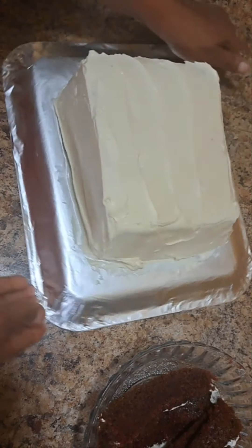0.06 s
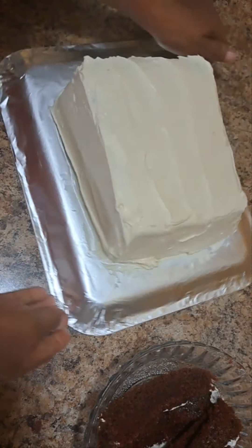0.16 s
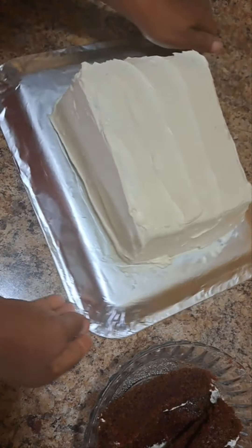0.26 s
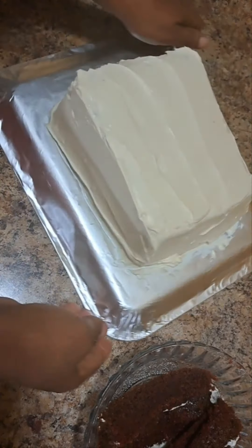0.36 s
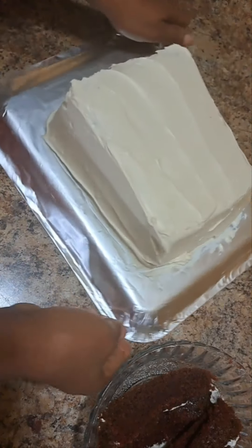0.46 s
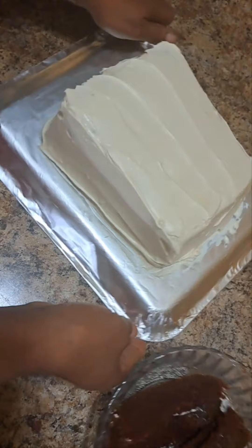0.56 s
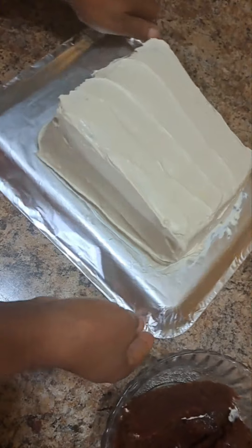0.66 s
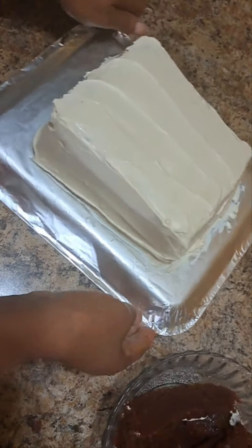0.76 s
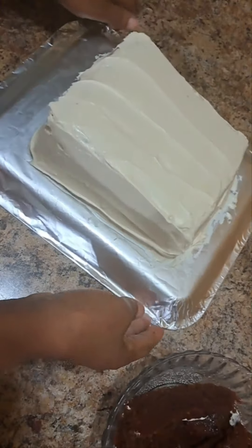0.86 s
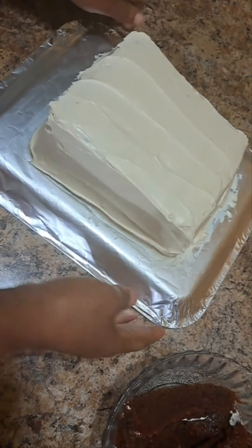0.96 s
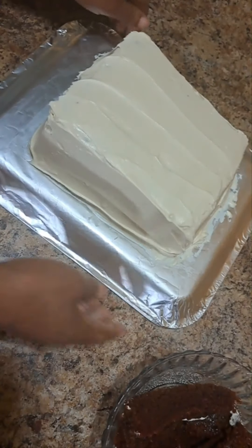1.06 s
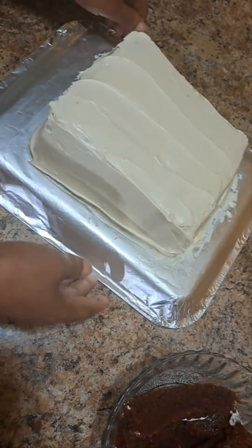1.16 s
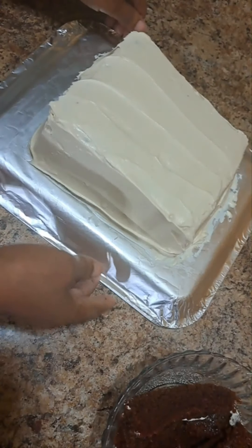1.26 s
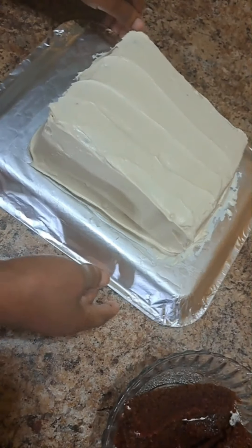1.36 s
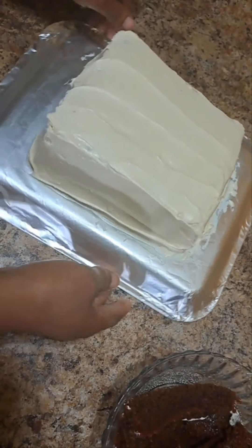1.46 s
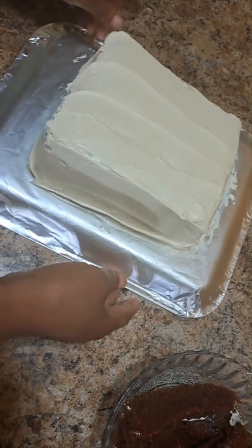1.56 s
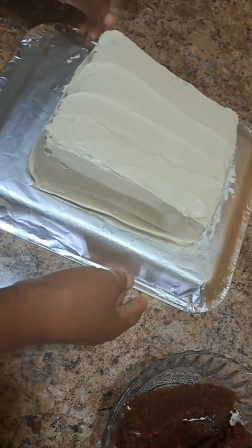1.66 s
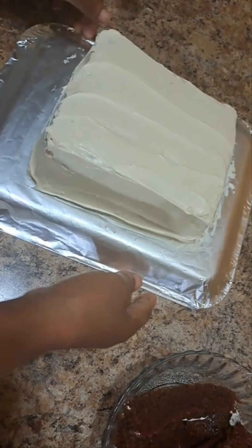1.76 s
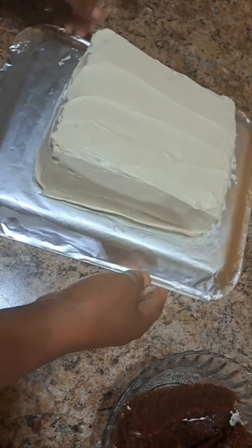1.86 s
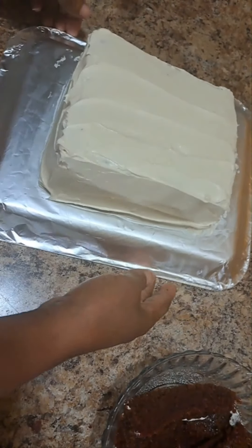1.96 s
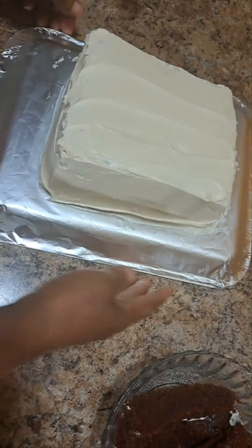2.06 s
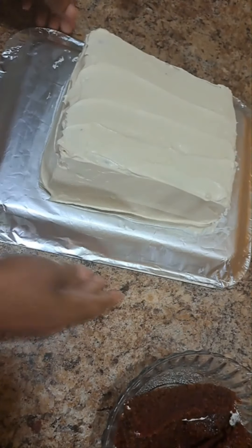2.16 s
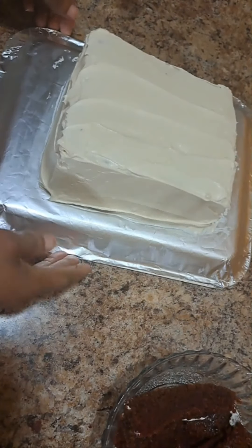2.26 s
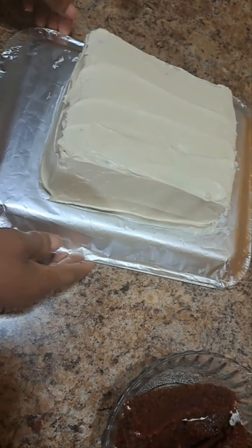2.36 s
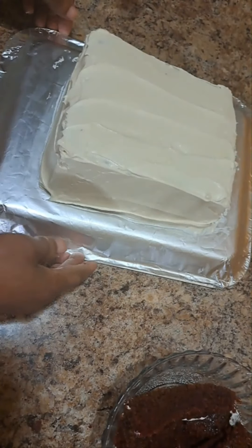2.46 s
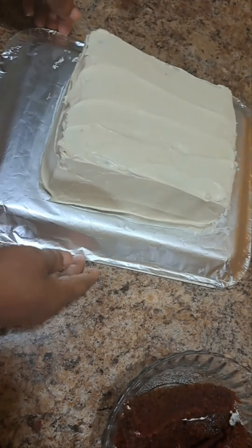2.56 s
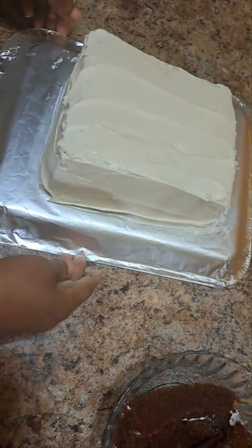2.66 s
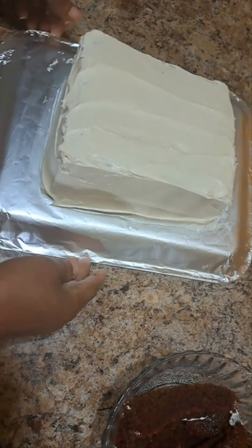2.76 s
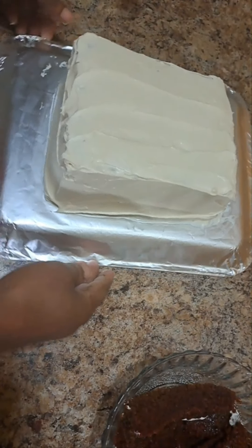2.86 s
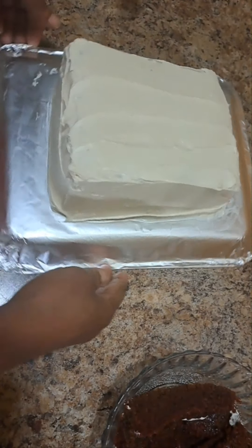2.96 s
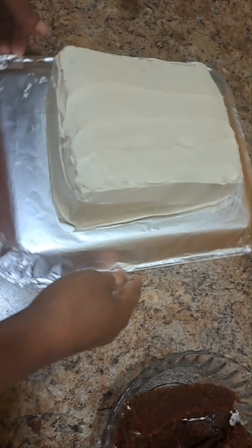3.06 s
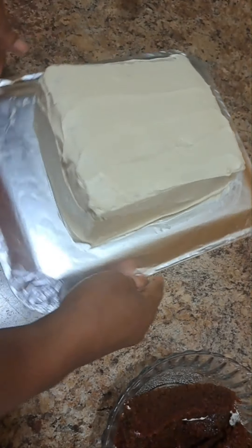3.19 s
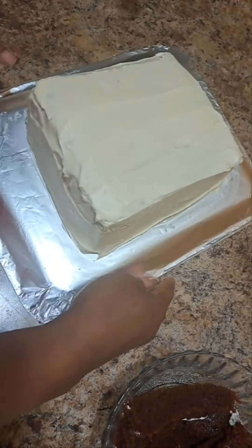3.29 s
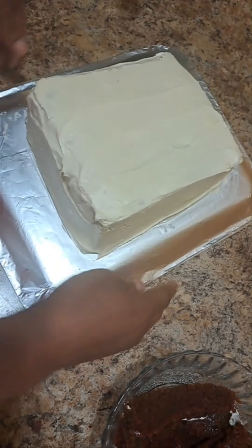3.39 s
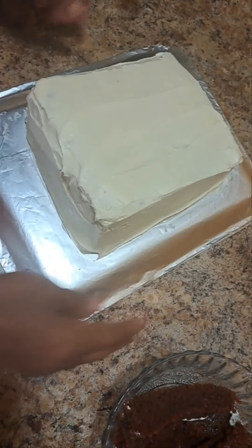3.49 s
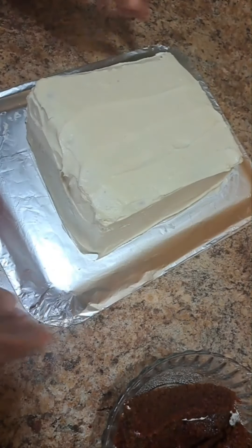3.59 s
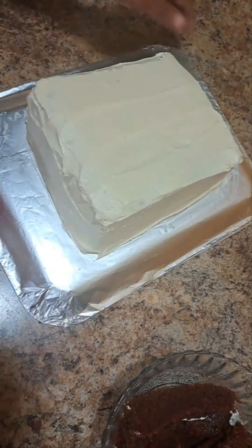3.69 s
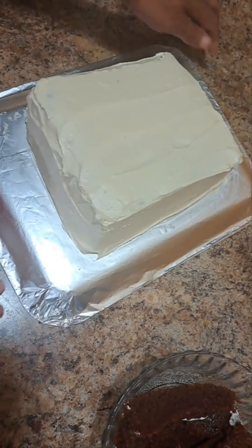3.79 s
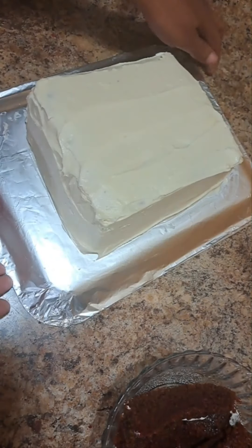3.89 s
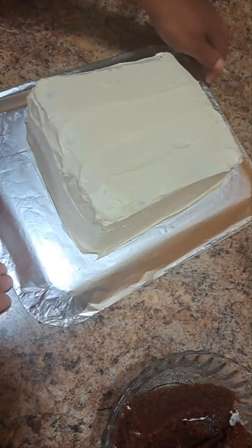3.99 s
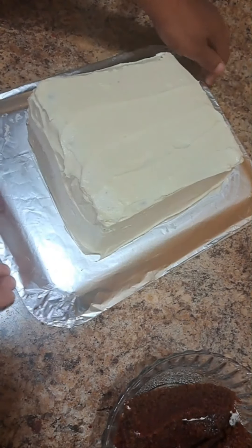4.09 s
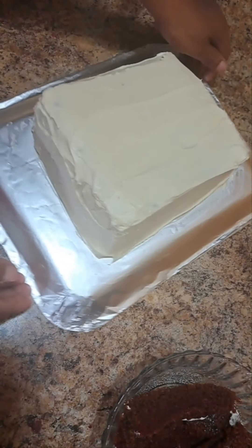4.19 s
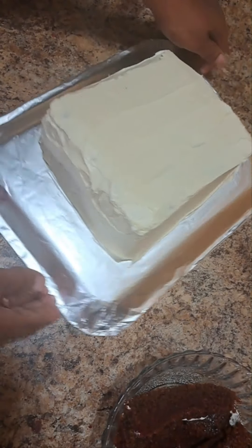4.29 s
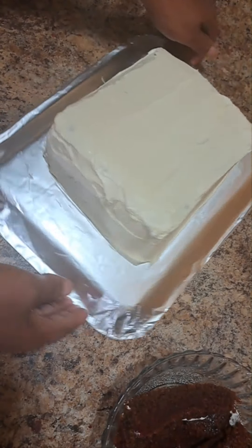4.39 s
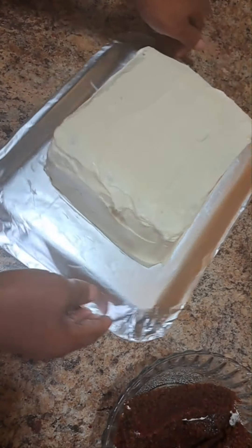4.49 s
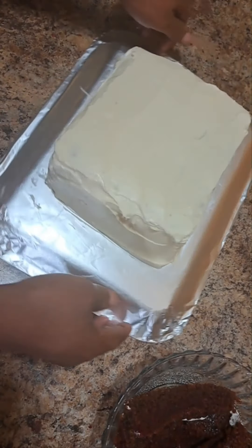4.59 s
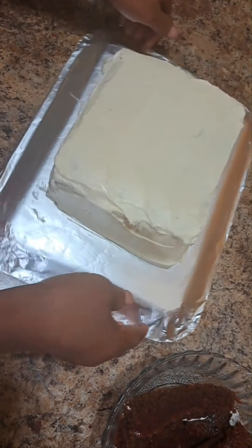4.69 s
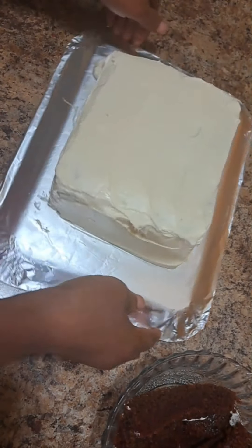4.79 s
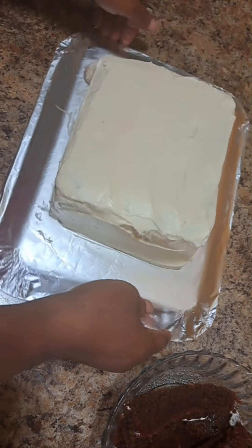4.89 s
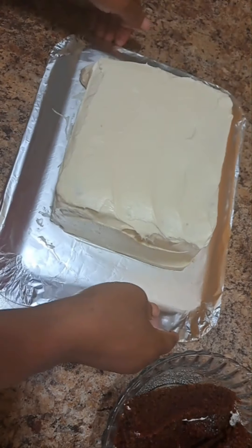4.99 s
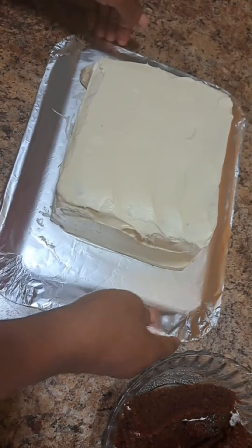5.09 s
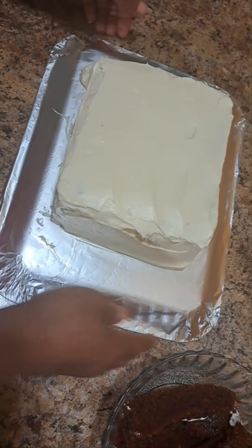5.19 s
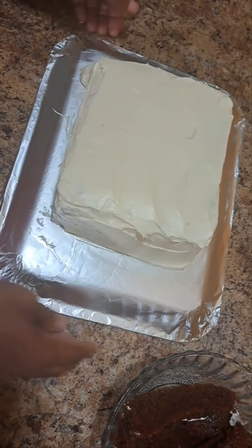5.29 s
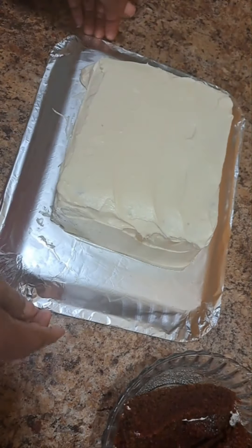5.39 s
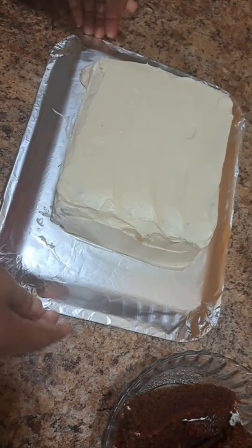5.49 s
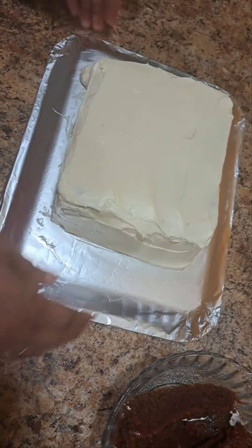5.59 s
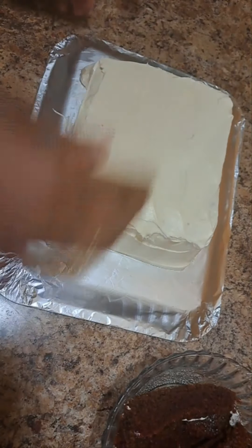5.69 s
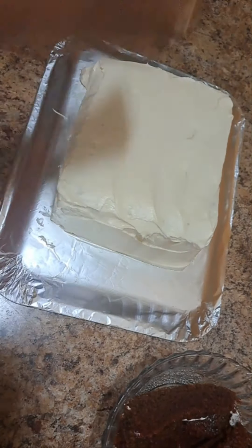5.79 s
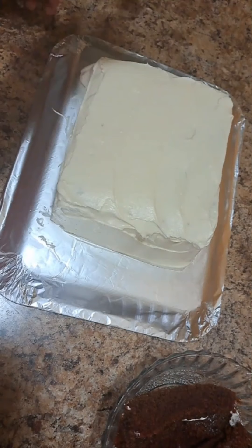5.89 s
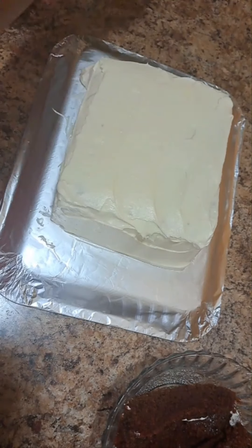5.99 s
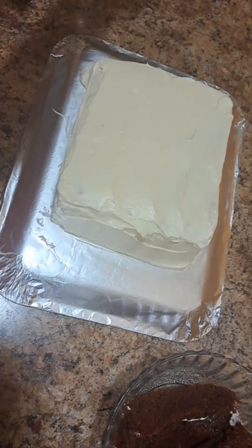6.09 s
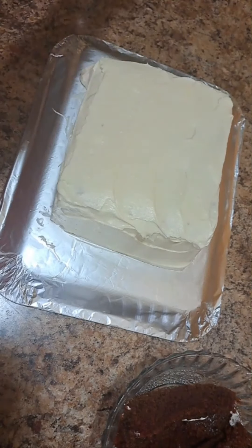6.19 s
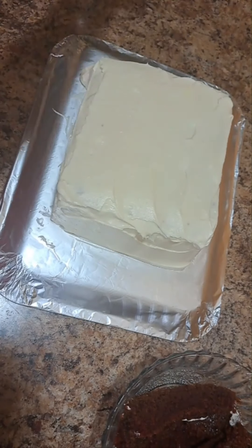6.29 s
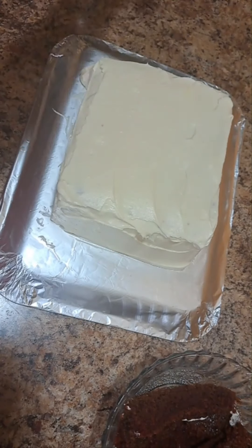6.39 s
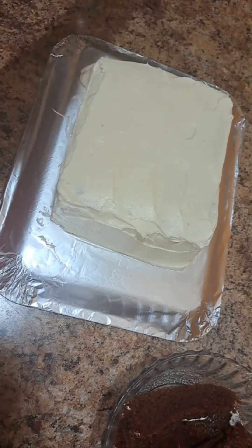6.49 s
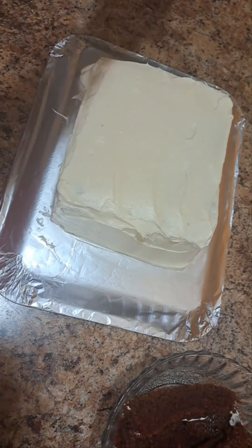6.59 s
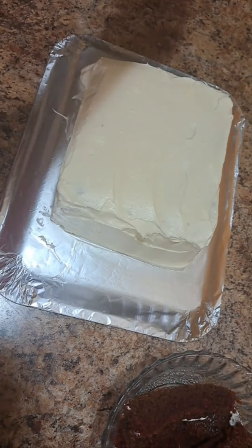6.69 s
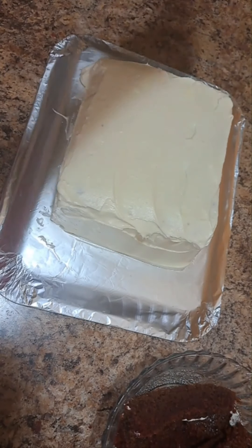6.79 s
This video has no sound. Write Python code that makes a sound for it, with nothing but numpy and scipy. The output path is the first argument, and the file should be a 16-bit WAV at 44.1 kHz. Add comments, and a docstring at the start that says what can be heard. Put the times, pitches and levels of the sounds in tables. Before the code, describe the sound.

Thin foil tray hisses and groans as hands turn it on a stone counter, creases snapping sharply, with soft bumps and a dull closing scrape.

```python
"""Foil hisses and a loaded tray groans from the start, as a cake in a foil-covered tray is turned in pushes
on a stone kitchen counter: filtered noise, grained by random slips, follows each push.
Low rumble and faint room hiss, both wavering noise, lie underneath. Creases snap as short noise bursts and
hands bump the tray as damped sines and noise. Later a sine hums in passing, pressing makes narrow modes sing
and a last dull shove scrapes."""
import sys
import numpy as np
from scipy import signal
from scipy.fft import rfft, irfft, next_fast_len
from scipy.io import wavfile
from scipy.ndimage import map_coordinates

SR = 44100
rng = np.random.default_rng(int(sys.argv[2]) if len(sys.argv) > 2 else 0)


def digitize_waveform(pressure):
    """Quantize a signal to 16-bit integers and store it at the path in sys.argv[1].

    Rows of a 2-D input are taken as channels; values are limited to [-1, 1].
    """
    field = np.atleast_2d(pressure).T
    bounded = np.clip(field, -1, 1)
    quanta = np.round(bounded * 32767).astype(np.int16)
    wavfile.write(sys.argv[1], SR, quanta)


def linear_from_db(decibels):
    """Turn decibels (scalar or array-like) into linear amplitude factors; 0 gives 1."""
    return 10 ** (np.asarray(decibels, float) / 20)


N = 302082
T = np.arange(N) / SR


def columns(table):
    """Each column of a curve after its time column, one value a sample."""
    s, *rest = np.transpose(table)
    return [np.interp(T, s, c) for c in rest]


def unit(x):
    """Scaled to rms 1."""
    return x / np.sqrt(np.mean(x ** 2))


def shape(x, gain):
    """Zero-phase filter by a gain given as a function of frequency."""
    n = next_fast_len(x.shape[-1])
    hz = np.arange(n // 2 + 1) * SR / n + 1
    return irfft(rfft(x, n) * gain(hz), n)[..., :x.shape[-1]]


def colour(points):
    """Gain through (Hz, dB) points, joined over log frequency."""
    hz, db = np.transpose(points)
    return lambda f: linear_from_db(np.interp(np.log(f), np.log(hz), db))


def resonances(modes):
    """Gain of steep (Hz, width Hz, dB) resonances, added in power."""
    def gain(f):
        return np.sqrt(sum((linear_from_db(db) / (1 + ((f - hz ** 2 / f) / width) ** 2)) ** 2 for hz, width, db in modes))
    return gain


def below(hz):
    """Steep low-pass gain."""
    return lambda f: 1 / np.sqrt(1 + (f / hz) ** 8)


# Likeness of left and right. Each row: frequency in Hz, likeness 0-1.
LIKENESS = [(60, 0.92), (130, 0.78), (290, 0.67), (640, 0.22), (1410, 0), (3100, 0.01), (6820, 0.0),
            (15000, 0)]


def noise():
    """Left and right noise, alike in the bass and unrelated in the treble."""
    mid, side = rng.standard_normal((2, N))
    hz, share = np.transpose(LIKENESS)

    def alike(f):
        return np.clip(np.interp(np.log(f), np.log(hz), share), 0, 1)

    mid = shape(mid, lambda f: np.sqrt(1 + np.sqrt(alike(f))))
    side = shape(side, lambda f: np.sqrt(1 - np.sqrt(alike(f))))
    return np.array([mid + side, mid - side]) / 2


def walk(per_s):
    """Slow chance: per_s random levels a second joined smoothly, spread near 1."""
    knots = rng.standard_normal(int(60 * N / SR))
    return map_coordinates(knots, [T * per_s], order=3)


def fade(x, t60_s):
    """Every impulse of x dies away exponentially."""
    return signal.lfilter([1], [1, -np.exp(-np.log(1000) / (t60_s * SR))], x)


def slips(per_s, spread_db, t60_s):
    """Envelope of dense random slips of unequal size, each with a sharp start and a short ring; rms 1."""
    when, size = rng.random(N), rng.exponential(size=N)
    power = (when < per_s / SR) * linear_from_db(2 * spread_db * size)
    return unit(np.sqrt(fade(power, t60_s / 2)))


# Turning the tray and brushing its rim, one table a push. Each row: time in seconds, foil hiss in dB (sliding
# speed), scrape in dB (weight on the stone), centre of the tray's groan in Hz.
PUSH_CURVES = [
    [(0.0, -59, -70, 355), (0.126, -42, -60, 415), (0.234, -50.5, -60, 492), (0.31, -46.5, -59.5, 396),
     (0.44, -48.5, -59.5, 501), (0.488, -53.5, -58.5, 393), (0.574, -51, -60, 680), (0.694, -55, -63, 590),
     (0.766, -52, -60.5, 370), (0.948, -53, -62.5, 380), (1.056, -58, -66.5, 520), (1.136, -54, -63.5, 503),
     (1.198, -62, -66.5, 356), (1.3, -75, -79.5, 390)],
    [(1.61, -71, -82, 344), (1.658, -62, -66, 379), (1.692, -53.5, -63.5, 454), (1.774, -54.5, -64, 436),
     (1.806, -56, -66, 417), (1.942, -59, -70, 348), (2.02, -64.5, -74.5, 418)],
    [(2.03, -59.5, -72, 395), (2.104, -53.5, -70, 441), (2.152, -50, -62, 397), (2.178, -54, -66.5, 444),
     (2.244, -51, -63, 440), (2.31, -60.5, -74, 325)],
    [(2.55, -78, -74, 380), (2.588, -76, -61, 344), (2.628, -79, -69.5, 448), (2.66, -74, -69, 376),
     (2.742, -56.5, -70.5, 333), (2.8, -79, -82, 315)],
    [(2.9, -77, -96, 327), (2.96, -63.5, -81, 324), (3.024, -56, -70, 411), (3.076, -52.5, -67, 357),
     (3.164, -50.5, -60.5, 430), (3.222, -49.5, -62, 395), (3.252, -44.5, -60.5, 458),
     (3.306, -49, -61, 440), (3.412, -46, -58.5, 437), (3.466, -45.5, -58.5, 470), (3.512, -46, -56.5, 364),
     (3.586, -51, -62.5, 384), (3.642, -78, -71, 357), (3.7, -86, -89, 314)],
    [(4.33, -73, -87, 306), (4.432, -51, -65, 328), (4.498, -50, -60, 347), (4.556, -49.5, -61, 503),
     (4.61, -45.5, -58, 430), (4.66, -47, -60.5, 610), (4.738, -50, -63, 380), (4.82, -47, -60, 523),
     (4.858, -54.5, -63, 410), (4.924, -50.5, -62, 530), (5.058, -54, -65.5, 355),
     (5.14, -56.5, -62.5, 445), (5.234, -55, -64, 389), (5.32, -77, -78.5, 416)],
    [(5.36, -73, -72, 352), (5.39, -63, -83, 377), (5.448, -76, -85, 331), (5.5, -74, -100, 390)],
    [(5.61, -71, -86, 339), (5.714, -69, -94, 368), (5.786, -68, -97, 349), (5.948, -84, -105, 344),
     (6.0, -93, -104, 346)],
]


def contact():
    """Hiss and scrape levels in dB: the strongest push at each moment, each fading outside its own span."""
    let_go_db_per_s = 500
    levels = []
    for s, hiss_db, scrape_db, _ in map(np.transpose, PUSH_CURVES):
        outside_s = np.maximum(0, np.maximum(s[0] - T, T - s[-1]))
        levels.append([np.interp(T, s, c) - let_go_db_per_s * outside_s for c in (hiss_db, scrape_db)])
    return np.max(levels, axis=0)


# Colour of foil noise. Each row: frequency in Hz, relative density in dB.
FOIL_COLOUR = [(1180, -19.5), (2000, -43), (2200, -17.5), (3000, -17.5), (3220, -14), (5240, -3.5),
               (6470, -7), (8000, -6.5), (9050, -10.5), (12800, -5), (15100, -9), (15900, -14.5),
               (16500, -110)]
# Body modes of the loaded tray. Each row: frequency in Hz, width in Hz, relative level in dB.
TRAY_MODES = [(285, 57, 2.5), (328, 100, -4), (390, 59, 1), (498.8, 61, 0.5), (658, 63, -9.5),
              (768, 520, -1)]
# Modes of tray and counter under friction. Each row: frequency in Hz, width in Hz, relative level in dB.
SCRAPE_MODES = [(1090, 390, -9), (1556, 590, 5.2), (1820, 150, -0.5), (2110, 620, 2.5)]


def slide():
    """Countless creases slip over the stone: bright hiss from the foil, rougher groan and scrape from the tray."""
    groan_over_scrape_db, creak_over_rumble_db = 6, -11.5
    dull_over_scrape_db, dull_slope, firm_push_db = 4, 0.33, -63
    hiss_db, scrape_db = contact()
    creak_db = columns(HAND_LEAN)[0] + creak_over_rumble_db
    groan_db = np.maximum(scrape_db + groan_over_scrape_db, creak_db) + 0.7 * walk(12.0)
    centre_hz = columns(np.vstack(PUSH_CURVES))[2]

    grain = slips(per_s=1700.0, spread_db=-1.5, t60_s=0.097)
    foil = shape(noise() * grain, colour(FOIL_COLOUR))
    dull = shape(foil, below(2870.0))
    bright = foil - dull
    # a firmer push gains more dull hiss than scrape
    dull_db = scrape_db + dull_over_scrape_db + dull_slope * (scrape_db - firm_push_db)

    rub = noise() * slips(per_s=180.0, spread_db=3.0, t60_s=0.21)
    # the modes nearest the centre are rubbed hardest
    groan = sum(shape(rub, resonances([mode])) * linear_from_db(-5 * np.log2(mode[0] / centre_hz) ** 2)
                for mode in TRAY_MODES)
    scrape = shape(noise() * grain, resonances(SCRAPE_MODES))

    hiss = linear_from_db(hiss_db) * unit(bright) + linear_from_db(dull_db) * unit(dull)
    return hiss + linear_from_db(groan_db) * unit(groan) + linear_from_db(scrape_db) * unit(scrape)


# How hard the hands lean on tray and counter. Each row: time in seconds, rumble in dB before its waver.
HAND_LEAN = [(0.0, -53), (0.05, -53), (0.5, -66), (0.53, -55), (0.95, -52), (0.99, -59.5), (1.39, -50.5),
             (1.51, -58), (1.66, -56), (1.93, -56.5), (2.67, -56), (3.45, -55), (3.57, -51), (3.7, -64.5),
             (3.91, -66), (3.97, -56), (4.1, -61), (4.16, -60), (4.21, -55.5), (4.67, -63.5), (4.94, -58.5),
             (5.06, -65), (5.15, -59), (5.57, -67.5), (5.61, -54), (5.8, -71), (6.45, -71.5), (6.56, -61),
             (6.66, -76.5), (6.85, -72)]
# Colour of the deep rumble. Each row: frequency in Hz, relative density in dB.
DEEP_COLOUR = [(15, -36), (25, -10), (41, -6), (54, 2.5), (70, 6), (92, -13.5), (110, -1), (140, -9),
               (240, -120)]


def rumble():
    """The counter's weight shifting, heavier the harder the hands lean or drag; each band wavers alone."""
    upper_over_lean_db, drag_over_scrape_db = -3, -4.5
    lean_db = columns(HAND_LEAN)[0]
    deep = unit(shape(noise(), colour(DEEP_COLOUR)))
    upper = unit(shape(noise(), resonances([(115.4, 92, -5.0), (139.0, 12, -7), (238, 220, -17)])))
    shake = np.hypot(linear_from_db(lean_db + upper_over_lean_db), linear_from_db(contact()[1] + drag_over_scrape_db))
    return linear_from_db(lean_db + 0.68 * walk(6.0)) * deep + linear_from_db(1.4 * walk(13.0)) * shake * upper


# Colour of the room and microphone hiss. Each row: frequency in Hz, relative density in dB.
AIR_COLOUR = [(35, -1.5), (60, -32), (127, 0.5), (358, -3.5), (708, -24.5), (796, -11), (1300, -12.5),
              (1610, -7), (1990, -13.5), (3340, -22.5), (12700, -21), (15400, -23.5), (16500, -44)]
# Faint whir near 1.6 kHz. Each row: time in seconds, level in dB.
WHIR_LEVEL = [(0.0, -103), (1.4, -72), (2.9, -74), (3.45, -77), (3.7, -103), (4.4, -82), (4.7, -66),
              (5.4, -97), (6.0, -100)]


def background():
    """Gently varying room and microphone hiss, with a narrow whir that wanders in level."""
    air_db, air_waver_db = -73, 0.9
    air = unit(shape(noise(), colour(AIR_COLOUR)))
    whir = unit(shape(noise(), resonances([(1575, 240, 0)])))
    whir_db = columns(WHIR_LEVEL)[0]
    return linear_from_db(air_db + air_waver_db * walk(2.694)) * air + linear_from_db(whir_db) * whir


# Creases snapping. Each row: start in seconds, burst level in dB before envelope and pan, treble tilt in dB,
# time for the tear to halve in ms (0.5 at least).
CREASE_SNAPS = [(0.132, -46, -17, 7.9), (0.397, -45, -2, 4.1), (0.492, -50, 4, 21), (1.0096, -43, 3, 3.9),
                (1.171, -52, 1, 12), (1.2788, -65.5, -8, 18), (1.3685, -64, -1, 21), (1.3826, -53, 1, 5.9),
                (1.4656, -53, -4, 5.6), (1.47, -52.5, 0.1, 2.5), (1.5534, -65.5, -4, 3.1),
                (1.616, -48.5, 5, 1.5), (1.6302, -49, 0, 2.5), (1.666, -57, -7, 15),
                (1.7728, -46.5, 24, 2.1), (1.841, -49, 15, 2.5), (2.1364, -49.5, 1, 6.7),
                (2.1657, -47, 7, 2.6), (2.3191, -38.5, -2.5, 2.2), (2.3476, -42.5, 19, 7.5),
                (2.3703, -52, -7, 3.2), (2.3714, -39.5, -9, 2.2), (2.464, -54.5, -8, 1.7),
                (2.4741, -52, -8, 1.4), (2.5202, -53, -6, 9.8), (2.528, -44.5, 3, 5), (2.534, -50, -3, 2.9),
                (2.5697, -43, 2, 5.6), (2.5944, -42, 4, 2.9), (2.6247, -41, -0.5, 6.6),
                (2.6465, -48, -17, 2.1), (2.6734, -42, 9, 4.3), (2.6822, -43, -4, 3.5),
                (2.822, -64.5, -8, 3.5), (2.991, -47, 2, 0.8), (3.0952, -52, 7.5, 2),
                (3.1219, -43.5, 9, 12), (3.3247, -49, 2, 3.8), (3.372, -47, 9, 14), (3.4755, -44, 9, 1.9),
                (3.573, -29.5, 6, 0.49), (3.5963, -36.5, -15, 1.8), (3.6353, -43, -5, 2.3),
                (3.7876, -62, 4, 1.8), (4.1435, -65, -3, 17), (4.28, -69, 11, 4.2), (4.296, -70.5, 4, 7.7),
                (4.366, -65, -7, 3.7), (4.3753, -47.5, 5, 2.4), (4.4515, -51, 6, 2.6),
                (4.4687, -50, 15, 6.8), (4.872, -46.5, 12, 2.5), (4.9922, -44, 18, 6.4),
                (5.1087, -41, 11, 1.9), (5.1331, -47, -5, 5.2), (5.1538, -43.5, 4, 2.1),
                (5.161, -40, 6, 2.2), (5.196, -49.5, 9, 3), (5.229, -47.5, 12, 7.9),
                (5.2702, -41.5, -18, 2), (5.3467, -54, 6, 6.9), (5.38, -55, -2.1, 9.5),
                (5.4012, -49.5, 3.5, 10.5), (5.431, -46, -1, 2.5), (5.6207, -47.5, -12.5, 3.2),
                (5.669, -57.5, 2, 4.1), (5.723, -56.5, 4, 10), (5.806, -59.5, -3, 3.6), (5.814, -60, 5, 2),
                (5.833, -52, 1, 0.97), (5.845, -59, -2, 6.8), (5.9613, -75, -3, 5.6),
                (6.655, -76, -18, 2.5)]


def snaps():
    """A crease flips: a burst in the foil's colour, tilted crease by crease, with a knock of the tray."""
    rise_s, click_ms, click_db = 0.00035, 0.13, -18
    rattle_t60_s, rattle_db = 0.035, -8.5
    pan_spread_db = 7.5
    # duller and louder creases knock the tray harder
    knock_base_db, knock_db_per_tilt_db, knock_db_per_db, crisp_snap_db = -16.5, -0.11, 0.46, -31
    out, t = np.zeros((2, N + SR)), T[:SR // 4]
    for s, level_db, tilt_db, tear_ms in CREASE_SNAPS:
        tilt = colour([(4500, -tilt_db / 2), (11500, tilt_db / 2)])
        chance = rng.standard_normal((3, len(t)))
        pan_db = pan_spread_db * rng.standard_normal()
        knock_db = knock_base_db + knock_db_per_tilt_db * tilt_db + knock_db_per_db * (level_db - crisp_snap_db)
        knock = linear_from_db(knock_db) * unit(shape(chance[2], resonances([(1020, 5900, 0)])))
        burst = unit(shape(chance[:2], lambda f: colour(FOIL_COLOUR)(f) * tilt(f))) + knock
        # the crease tears along for a few ms and stops, then the sheet rattles out
        tear = 1.2 * np.exp(-np.log(2) * (1000 * t / max(tear_ms, 0.5)) ** 1.3)
        click = linear_from_db(click_db) * np.exp(-1000 * t / click_ms)
        rattle = linear_from_db(rattle_db - 60 * t / rattle_t60_s)
        envelope = (1 - np.exp(-t / rise_s)) * (tear + click + rattle)
        i = int(s * SR)
        out[:, i:i + len(t)] += linear_from_db(level_db + np.array([[pan_db], [-pan_db]]) / 2) * envelope * burst
    return out[:, :N]


# Hands bumping tray and counter; the rows at 2.568, 2.625 and 2.683 s are the tray knocked by snapping creases.
# # Each row: start in seconds, thump level in dB, pitch in Hz, tray ring in dB before its decay.
HAND_BUMPS = [(0.797, -45, 256, -40), (0.815, -45, 117, -37.5), (0.845, -38, 190, -37),
              (0.861, -44, 101, -37.5), (0.877, -40, 143, -44), (0.911, -43, 126, -47),
              (1.32, -43, 105, -53), (1.262, -48, 78.5, -71), (2.421, -42, 71, -53.5),
              (2.589, -59, 74.5, -75), (2.751, -43, 89, -70), (1.374, -43, 137, -48.5),
              (2.459, -45, 163, -48.5), (2.568, -64, 202, -54), (2.625, -63, 202, -47.5),
              (2.683, -61, 199, -71), (3.96, -47, 128, -46.5), (3.966, -40.5, 130, -56),
              (4.147, -32, 174.5, -45.5), (4.159, -25.5, 158.2, -44), (4.177, -35, 139, -53),
              (4.204, -60, 168, -60), (4.255, -41, 129, -67), (4.352, -42.5, 137, -61),
              (4.441, -46, 247, -50), (5.225, -62, 150, -50.5), (5.599, -47, 115, -50.5),
              (5.62, -45, 203, -44.5), (5.636, -50, 109, -66), (5.65, -46, 133, -49.5),
              (5.678, -45, 101, -62), (5.931, -56, 68.6, -83), (6.114, -59.5, 70, -85),
              (6.516, -39.5, 273, -60), (6.541, -43, 194.5, -55), (6.662, -63, 126, -63)]
# Modes of a thump. Each row: multiple of the pitch, relative level in dB.
THUMP_MODES = [(0.698, -7.5), (1.002, 2), (1.399, -8)]


def bumps():
    """Soft blows thump the counter in a few damped low modes, shake the tray, and the skin adds a dull tick."""
    thump_t60_s, rise_s = 0.12, 0.0025  # t60 at the pitch itself; higher modes die sooner
    tray_decay_s, tick_decay_s, tick_over_tray_db = 0.019, 0.013, -12
    out, t = np.zeros((2, N + SR)), T[:SR // 2]

    def soft(f):
        # a soft hand barely reaches the upper modes
        return resonances(TRAY_MODES)(f) / (1 + (f / 450.0) ** 3.94)

    for s, thump_db, hz, tray_db in HAND_BUMPS:
        thump = sum(linear_from_db(db - 60 * t * k / thump_t60_s) * np.sin(2 * np.pi * k * hz * t) for k, db in THUMP_MODES)
        chance = rng.standard_normal((3, len(t)))
        tray = unit(shape(chance[2], soft)) * np.exp(-t / tray_decay_s)
        tick = unit(shape(chance[:2], resonances([(1160, 1530, 0)]))) * np.exp(-t / tick_decay_s)
        blow = linear_from_db(thump_db) * thump + linear_from_db(tray_db) * tray
        i = int(s * SR)
        out[:, i:i + len(t)] += (1 - np.exp(-t / rise_s)) * blow + linear_from_db(tray_db + tick_over_tray_db) * tick
    return out[:, :N]


def room(x):
    """Hard kitchen walls: a diffuse tail, different at each ear and weak in the bass."""
    t60_s, wet_db, gap_s = 0.32, -5, 0.004
    t = T[:SR // 2]
    tail = rng.standard_normal((2, len(t))) * linear_from_db(-60 * t / t60_s) * (t > gap_s)
    tail = tail / np.sqrt(np.sum(tail ** 2, axis=1, keepdims=True))
    wet = signal.fftconvolve(x, tail, axes=1)[:, :N]
    return linear_from_db(wet_db) * shape(wet, lambda f: f / np.hypot(f, 400.0))


# The hum's swells. Each row: start in seconds, rise in seconds, sag in seconds, level after the rise in dB,
# level change over the sag in dB.
HUM_SWELLS = [(2.62, 0.053, 0.305, -53, 1.5), (3.0, 0.12, 0.38, -49, -4), (3.52, 0.055, 0.23, -59.5, 1.5),
              (3.96, 0.16, 0.089, -54, -13), (4.36, 0.046, 0.046, -53.5, -7), (4.48, .05, .4, -55.5, -5)]


def hum():
    """A low sine, wavering in pitch and level, that swells and dies away a few times."""
    centre_hz, waver_hz, end_s = 127.5, 1.64, 0.095
    gain = sum(np.interp(T, np.cumsum([s, rise_s, sag_s, end_s]), [0, linear_from_db(db), linear_from_db(db + change_db), 0])
               for s, rise_s, sag_s, db, change_db in HUM_SWELLS)
    level = np.sqrt(2) * gain * linear_from_db(0.51 * walk(10.0))
    phase = 2 * np.pi * np.cumsum(centre_hz + waver_hz * walk(5.0)) / SR
    return level * np.sin(phase)


# Pressing down in jerks. Each row: peak time in seconds, low pair in dB, high pair in dB.
PRESS_JERKS = [(3.19, -65, -63), (3.27, -54, -76), (3.378, -50, -77), (3.43, -80, -52.5), (3.474, -58, -53),
               (3.515, -52, -50.5)]
# Singing modes, low and high pair. Each row: frequency in Hz, width in Hz, relative level in dB.
LOW_PAIR = [(325, 8.5, -5), (501, 7.9, -4)]
HIGH_PAIR = [(1020, 120, 0), (1426, 160, 0)]


def sing():
    """Stick-slip under pressure rings the narrow modes: the low pair smoothly, the high pair with grain."""
    rise_db_per_s, fall_db_per_s = 250, 260
    low = unit(shape(noise(), resonances(LOW_PAIR)))
    grain = slips(per_s=260.0, spread_db=1.5, t60_s=0.057)
    high = unit(shape(noise() * grain, resonances(HIGH_PAIR)))
    out = np.zeros((2, N))
    for s, low_db, high_db in PRESS_JERKS:
        jerk_db = np.minimum(rise_db_per_s * (T - s), fall_db_per_s * (s - T))
        out += linear_from_db(jerk_db) * (linear_from_db(low_db) * low + linear_from_db(high_db) * high)
    return out


def shove():
    """A last short, dull scrape through a hollow body: resonant noise that trails off softly."""
    full_from_s, full_until_s, level_db = 6.495, 6.6, -53
    rise_db_per_s, fall_db_per_s = 603, 600
    tail_db, tail_db_per_s = -11.5, 122  # the slower trail, relative to full
    body = resonances([(410, 130, 2.5), (530, 63, 2), (713, 220, -11.5), (1440, 300, -21)])
    after_s = T - full_until_s
    fall_db = np.minimum(fall_db_per_s * after_s, tail_db_per_s * after_s - tail_db)
    outside_db = np.maximum(0, np.maximum(rise_db_per_s * (full_from_s - T), fall_db))
    return linear_from_db(level_db - outside_db) * unit(shape(noise(), body))


def scene():
    """Tray and hands over the background; snaps and bumps also sound the room."""
    sharp = snaps() + bumps()
    return slide() + rumble() + background() + sharp + room(sharp) + hum() + sing() + shove()


def roll_off(x):
    """The treble ends steeply here."""
    return signal.sosfilt(signal.butter(12, 16970, fs=SR, output="sos"), x)


# Colour of the microphone ports. Each row: frequency in Hz, left minus right in dB.
PORT_TILT = [(60, 0), (110, 1.5), (200, 0), (380, 3.5), (700, 0), (1290, 0.0), (2380, -0.5), (4400, -3.5),
             (8120, 0.5), (15000, -1.0)]


def record(dry):
    """Two microphone ports that differ a little in colour, with the deepest bass cut."""
    tilt = colour(PORT_TILT)
    left = shape(dry[0], lambda f: np.sqrt(tilt(f)))
    right = shape(dry[1], lambda f: 1 / np.sqrt(tilt(f)))
    ports = shape(np.array([left, right]), lambda f: 1 / np.sqrt(1 + (32.0 / f) ** 6))
    return roll_off(ports)


dry = scene()
out = record(dry)
digitize_waveform(out)
```